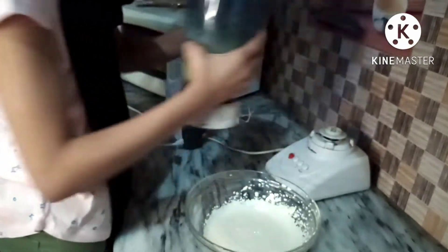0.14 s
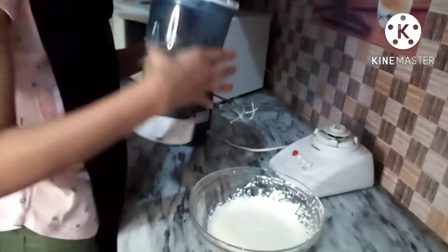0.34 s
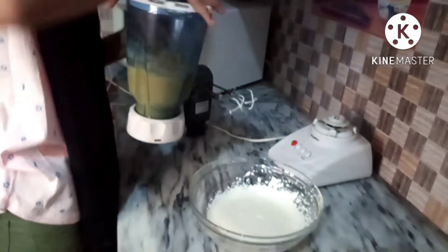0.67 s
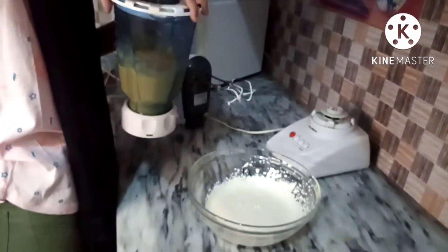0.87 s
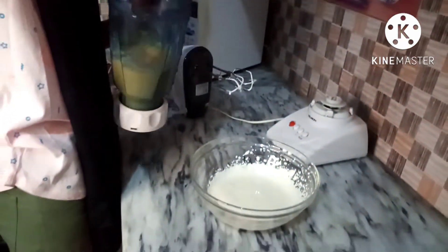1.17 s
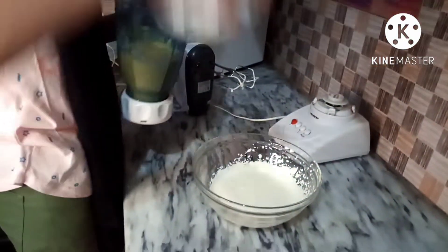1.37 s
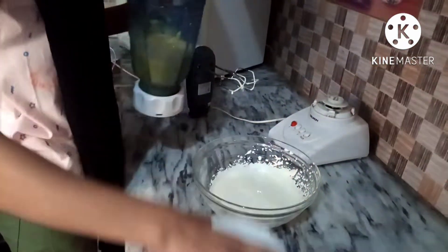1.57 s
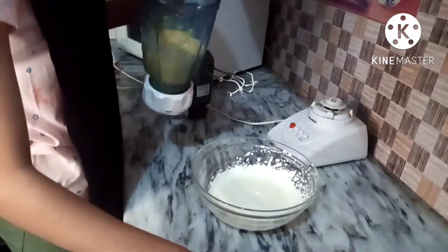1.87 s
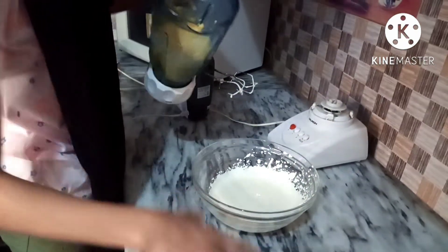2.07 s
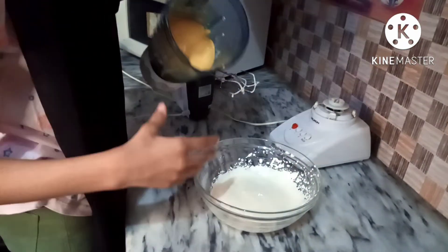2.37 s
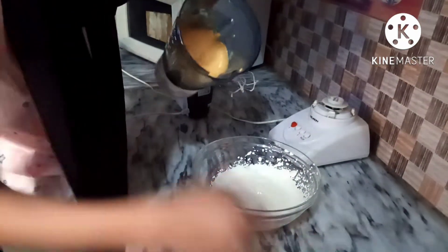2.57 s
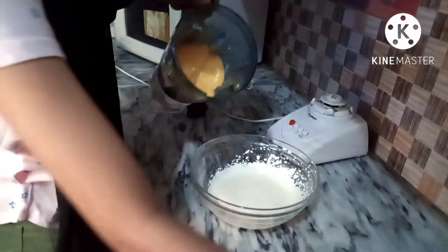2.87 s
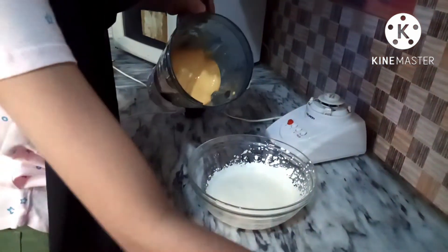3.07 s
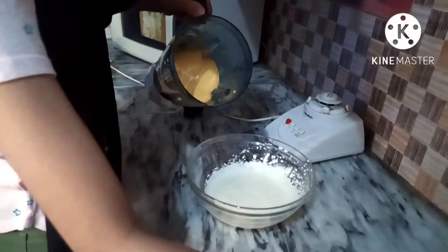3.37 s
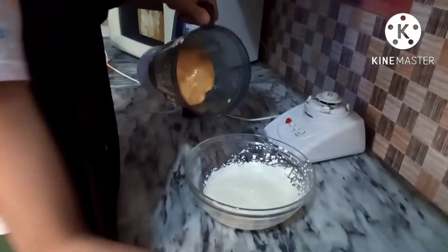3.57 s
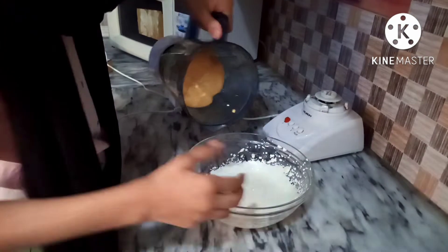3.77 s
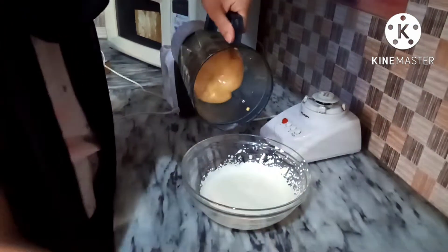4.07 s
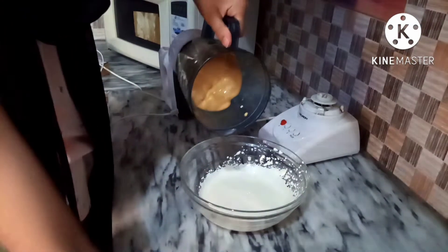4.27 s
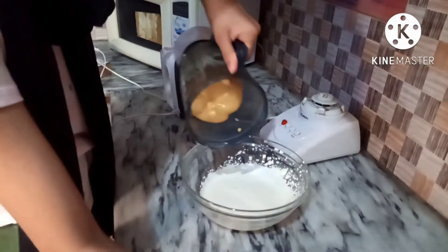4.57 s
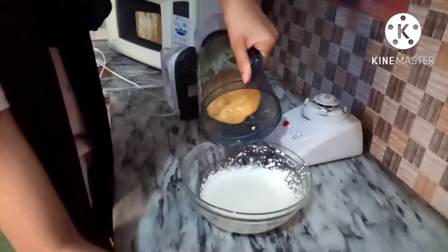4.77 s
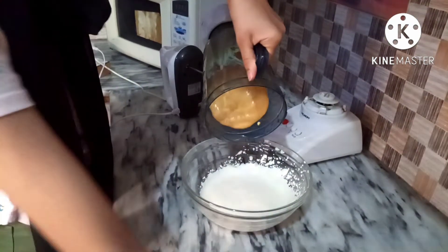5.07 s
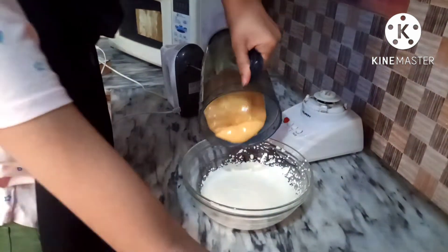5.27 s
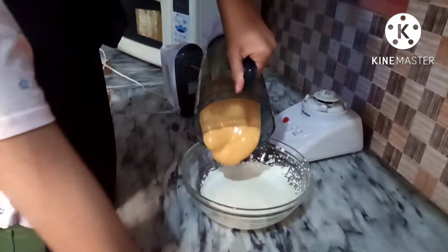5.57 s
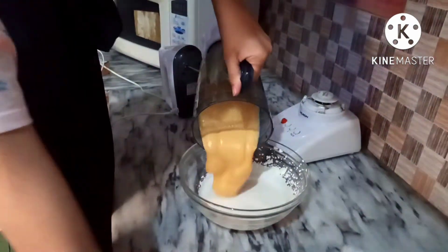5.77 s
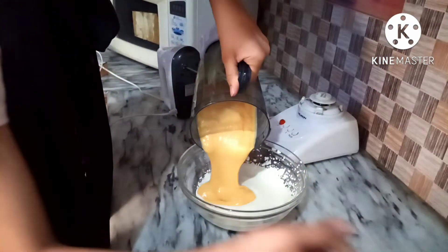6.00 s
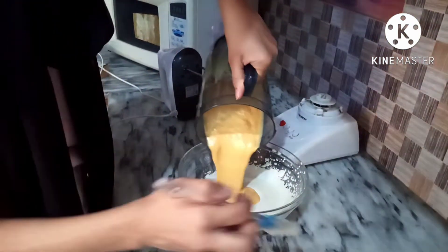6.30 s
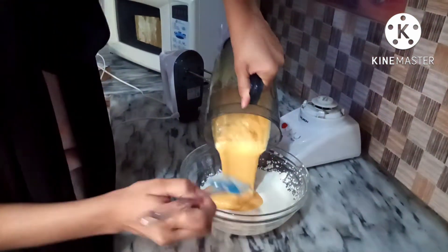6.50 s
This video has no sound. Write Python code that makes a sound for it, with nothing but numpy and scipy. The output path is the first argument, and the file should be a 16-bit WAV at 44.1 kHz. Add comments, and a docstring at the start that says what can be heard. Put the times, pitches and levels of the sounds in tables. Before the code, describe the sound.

A refrigerator hums and whines faintly in a small, slightly echoing kitchen. Close by, a plastic lid works loose from a blender jar in a few quiet snaps and thuds, and is put down on stone with one loud, dry clack. After a pause, a metal spoon clatters on the counter in two short ringing bursts, with light clinks against a filled glass bowl. Soft bumps and clothing rustles fall in between.

```python
"""Blender lid and spoon in a tiled kitchen

A plastic lid sticks and slips off a blender jar, thumping the air inside, then clacks on a stone counter.
A steel spoon ticks and bounces on the stone and clinks on a glass bowl. Each contact is a crack plus
decaying modes, echoed by the small room. Hands bump, sleeves rustle, a refrigerator hums and whines."""
import sys
import numpy as np
from scipy import signal
from scipy.fft import rfft, irfft, next_fast_len
from scipy.io import wavfile

SR = 44100
rng = np.random.default_rng(int(sys.argv[2]) if len(sys.argv) > 2 else 0)


def inscribe(sig):
    """Save sig as 16-bit PCM at rate SR to the path in sys.argv[1].

    A 1-D sig is mono; a 2-D sig holds one channel per row.
    Samples are clipped to [-1, 1] before scaling.
    """
    pcm = np.round(np.clip(np.atleast_2d(sig).T, -1, 1) * 32767)
    wavfile.write(sys.argv[1], SR, pcm.astype(np.int16))


N = 292812
TIME_S = np.arange(N) / SR
RING_S = np.arange(SR // 3) / SR
NOISE_HZ = np.fft.rfftfreq(next_fast_len(N, True), 1 / SR) + 1

ECHO_DECAY = [(150, .5), (600, .54), (1200, .49), (2500, .46), (5000, .41), (7500, .26), (11000, .18),
              (15000, .15)]  # echo decay as heard, treble cut short: f/Hz, t60/s
NOISE_FLOOR = [(25, -23), (45, -13), (70, -9), (130, -7), (190, -13.5), (450, -7.5), (700, -14.5),
               (1600, -17.5), (2400, -20.5), (3100, -17), (3750, -23), (4400, -18), (5500, -26),
               (7300, -29.5), (8000, -37.5), (14000, -34.5), (15300, -28)]  # room air plus a microphone hiss peak near 15 kHz: f/Hz, gain/dB
FRIDGE_DRONE = [(107.2, -81.5, 20), (151, -82, 18), (218.5, -81.5, 36), (299, -76.5, 32), (341, -76, 16)]  # low tones: f/Hz, level/dB, width/Hz
FRIDGE_WHINE = [(2610, -92, 17), (2862, -88.5, 45), (3140, -93, 16), (3228, -80.5, 30), (3274, -83, 23),
                (4100, -89.5, 21), (4240, -87.5, 20), (5540, -93, 40), (6067, -100, 17), (6630, -98.5, 10)]  # high tones: f/Hz, level/dB, width/Hz
PANEL_TONES = [(543, -2), (1928, -14.5)]  # loose refrigerator panel: f/Hz, gain/dB
PANEL_ENVELOPE = [(0, -93.5), (2.2, -88.5), (2.7, -78.5), (3.5, -81.5), (4.7, -75.5), (6.6, -75)]  # its swell: t/s, level/dB
HAND_BUMPS = [(0.384, -58), (.497, -60), (0.949, -58.5), (2.484, -58.5), (2.981, -61.5), (3.856, -57.5),
              (4.391, -56.5), (5.646, -61), (6.21, -62.5), (6.37, -60.5)]  # soft bumps: t/s, level/dB
SLEEVE_RUSTLES = [(0.267, -65.5, 3060), (2.199, -73, 4260), (2.536, -73, 1570), (4.764, -74, 3200),
                  (4.964, -70.5, 3070)]  # arm movements: t/s, level/dB, centre/Hz

BOWL_HITS = [(3.883, -50.5, -10), (5.306, -51, -5), (5.3095, -42.5, -0.5), (5.522, -58.5, -8.5),
             (5.5426, -41, 1.5), (5.563, -40, 3)]  # spoon on glass: t/s, level/dB, tilt/(dB/oct)
BOWL_MODES = [(1100, 0, .14), (1890, 2.5, 0.051), (3410, 4.5, .08), (3520, 9.5, 0.03), (4050, -4.5, 0.075),
              (5890, -21.5, 0.04)]  # filled glass bowl: f/Hz, level/dB, t60/s
BOWL_CRACK = [(200, -32), (650, -22), (850, -4.5), (1080, 6), (1400, -4), (1900, 1), (2500, -2), (3500, 8),
              (4200, 2.5), (5000, -4.5), (6200, 2.5), (7200, -27.5), (10000, -28), (15000, -30)]  # contact spectrum: f/Hz, gain/dB

SPOON_NUDGES = [(3.341, -45.5, 1.5, 0.28), (3.3908, -44.5, 3, 0), (3.758, -29, 3, 0.81),
                (3.7925, -31, 1, 1), (3.8782, -35, 7.5, .95), (3.906, -53, 8, 0.87)]  # held spoon on stone: t/s, level/dB, tilt/(dB/oct), hardness/(0-1)
HELD_SPOON_MODES = [(1078, -13, .05), (1650, -11.5, 0.022), (2300, -3.5, 0.029), (2439, -0.5, .04),
                    (3184, -2.5, 0.054), (3600, -3.5, .025), (4530, -12, 0.026), (5430, -4, 0.042),
                    (7996, -13, 0.06), (11200, -30.5, .05)]  # finger-damped steel: f/Hz, level/dB, t60/s
NUDGE_CRACK = [(60, -42), (200, -20.5), (600, -18.5), (1300, 2), (2200, 1), (3200, 0), (4000, -1.5),
               (5300, 1.5), (7000, -9), (8200, -6.5), (10500, -15), (14000, -9.5), (15200, -0.5)]  # contact spectrum: f/Hz, gain/dB
SPOON_BOUNCES = [(3.977, -38, -9.5), (3.981, -26, -2), (3.994, -30, -7), (4.0025, -22, -5),
                 (4.008, -22, -3.5), (4.014, -19.5, 2), (4.0188, -16.5, 0.5), (4.0468, -22.5, 2.5),
                 (4.066, -26.5, 1.5), (4.0835, -29.5, 0), (4.097, -29.5, 0.5), (4.109, -39, -4.5),
                 (4.115, -38, 2.5), (5.402, -46.5, -8.5), (5.411, -29.5, -2.5), (5.4152, -26, 1),
                 (5.4245, -27.5, 2), (5.432, -25.5, -1), (5.438, -30, -0.5)]  # loose spoon on stone: t/s, level/dB, tilt/(dB/oct)
FREE_SPOON_MODES = [(3403, -7, 0.12), (3430, -17, .35), (3414, 1, 0.12), (3456, -2, .08),
                    (4100, -12.5, .12), (5576, 2, 0.1), (5590, -19.5, .3), (5560, -12, 0.067),
                    (6230, -16, 0.044), (8096, -26.5, 0.11), (9100, -23.5, .08), (11090, -26.5, 0.1703),
                    (12720, -25, 0.086), (14302, -15.5, .13)]  # free steel: f/Hz, level/dB, t60/s
BOUNCE_CRACK = [(60, -41.5), (200, -21), (550, -20), (800, -7.5), (1100, -1.5), (1700, 3), (2100, -2.5),
                (2500, 0.5), (3400, 6), (5000, -2.5), (6200, 8), (7200, -36.5), (9200, -18.5), (10500, -36),
                (13000, -20.5), (15200, -22.5)]  # contact spectrum: f/Hz, gain/dB

RIM_SLIPS = [(0.675, -59.5, -49.5), (.691, -58, -48), (0.98, -58, -49.5), (1.0539, -47.5, -44),
             (1.071, -51.5, -40), (1.093, -55, -38), (1.1222, -48, -43), (1.156, -52.5, -66)]  # lid slipping on the jar: t/s, snap/dB, thud/dB
RIM_MODES = [(1203, 4.5, 0.023), (1772, 0, 0.054), (2320, -3, 0.03)]  # jar rim: f/Hz, level/dB, t60/s
RIM_CRACK = [(200, -11), (500, 10.5), (1800, 3), (3000, 5.5), (6200, -3), (7600, -28), (15000, -47)]  # snap spectrum: f/Hz, gain/dB
JAR_MODES = [(201, -22.5, 0.11), (326, -10, 0.3), (532, -11, 0.074), (651, -15, 0.07)]  # hollow jar: f/Hz, level/dB, t60/s
GAP_PITCH = [(.68, 330), (1.055, 334), (1.095, 450.5), (1.125, 399.4)]  # air resonance under the lifting lid: t/s, f/Hz
LID_LANDINGS = [(1.8653, -15, 2)]  # plastic on stone: t/s, level/dB, tilt/(dB/oct)
LID_MODES = [(604, -20.5, 0.036), (1157, -14, 0.14), (1276, -2.5, 0.067), (2170, 3.5, 0.039),
             (2228, -7.5, .08), (4078, -12.5, 0.045)]  # plastic lid: f/Hz, level/dB, t60/s
LID_CRACK = [(80, -36), (190, -16.5), (300, -30), (560, -7.5), (700, -10), (830, 0.5), (1200, 8),
             (1650, -3), (2200, 4.5), (3000, -5), (4100, -2), (5000, -9), (5600, -16.5), (6400, -13),
             (8000, -36), (13500, -44.5), (15000, -34)]  # contact spectrum: f/Hz, gain/dB


def amp(db):
    return 10 ** (np.asarray(db) / 20)


def lookup(points, hz):
    """Interpolate over log frequency."""
    f, value = np.transpose(points)
    return np.interp(np.log(hz + 1), np.log(f + 1), value)


def unit(x, size=None):
    """Scale so the first size samples have rms 1."""
    return x / np.sqrt(np.mean(x[:size] ** 2) + 1e-20)


def add(mix, start_s, sound):
    part = mix[round(start_s * SR):][:len(sound)]
    part += sound[:len(part)]


def colour(x, spectrum, size=2048):
    """Minimum-phase filter; keeps attacks sharp."""
    log_gain = np.log(amp(lookup(spectrum, abs(np.fft.fftfreq(size, 1 / SR)))))
    taps = np.fft.ifft(np.exp(np.conj(signal.hilbert(log_gain)))).real
    return signal.fftconvolve(x, taps)[:len(x)]


def noise(gain):
    """Steady noise, rms 1, shaped by gain over NOISE_HZ."""
    return unit(irfft(gain * rng.standard_normal(2 * len(gain)).view(complex))[:N])


def drift(rate_hz):
    """Slow random wander, rms 1."""
    return noise(np.exp(-(NOISE_HZ / rate_hz) ** 2))


def tones(lines):
    """Narrow noise bands: tones wavering in level and phase."""
    power = sum(amp(2 * db) / width_hz / (1 + (2 * (NOISE_HZ - hz) / width_hz) ** 2) ** 2
                for hz, db, width_hz in lines)
    rms = np.linalg.norm([amp(db) for _, db, _ in lines])
    return rms * noise(np.sqrt(power))


def fade(t60_s):
    return np.exp(-np.log(1000) * RING_S / t60_s)


def ring(modes, uneven_db=1, detune=0.002):
    """Decaying modes; each contact loads and excites them a little differently."""
    out = 0
    for hz, db, t60_s in modes:
        share, load = rng.standard_normal(2)
        loaded_hz = hz * (1 + detune * load)
        out += amp(db + uneven_db * share) * fade(t60_s) * np.sin(2 * np.pi * loaded_hz * RING_S)
    # a small body radiates little below its lowest mode
    radiation = signal.butter(2, modes[0][0] / 2, "high", fs=SR, output="sos")
    return unit(signal.sosfilt(radiation, out), size=128)


def crack(spectrum, spread_s, count=100, size=4096):
    """Contact click, dispersed by many heavily damped resonances."""
    hz = (np.arange(count) + 2 * rng.random(count)) / spread_s
    pole_rad = 2 * np.pi * hz[hz < SR / 2] / SR
    radius = np.exp(-1.4 / (spread_s * SR))
    all_pass = [(radius ** 2, c, 1, 1, c, radius ** 2) for c in -2 * radius * np.cos(pole_rad)]
    click = colour(signal.sosfilt(all_pass, signal.unit_impulse(size)), spectrum)
    return np.pad(unit(click, size=128), (0, len(RING_S) - size))


def blow(sound, db, tilt_db_oct):
    """Tilt the strike brighter or duller; set the level of its first 3 ms."""
    tilt = [(2 ** octave, tilt_db_oct * (octave - 10)) for octave in (9, 13)]
    return amp(db) * unit(colour(sound, tilt), size=128)


def brush(length_s, centre_hz, width_oct):
    """Soft grainy puff; swells quickly, then ebbs."""
    hz = np.fft.rfftfreq(len(RING_S), 1 / SR) + 1
    fibres = rng.standard_normal(len(RING_S)) * rng.exponential(1, len(RING_S))
    band = np.exp(-0.5 * (np.log2(hz / centre_hz) / width_oct) ** 2)
    rub = unit(irfft(rfft(fibres) * band, len(RING_S)))
    age = 3 * RING_S / length_s  # envelope peaks at age 1
    return rub * age * np.exp((1 - age ** 2) / 2)


def kitchen(x, early_db=3, early_s=0.022, count=5000):
    """Dense echoes off tiles and counter; decay set per band, treble cut short."""
    taps = np.zeros(SR)
    taps[rng.integers(SR // 300, SR, count)] = rng.choice([-1., 1.], count)
    hz, t, bands = signal.stft(taps, SR, nperseg=256)
    decay = np.exp(-np.log(1000) * t / lookup(ECHO_DECAY, hz)[:, None])
    early_boost = amp(early_db * np.exp(-t / early_s))
    tail = signal.istft(bands * decay * early_boost, SR, nperseg=256)[1]
    return signal.fftconvolve(x, tail / np.linalg.norm(tail))[:N]


def background_noise(floor_db=-76, waver_db=0.8, rumble_db=-76.5, lumps_db=3.5):
    """Quiet room air, microphone hiss and a lumpy low rumble."""
    floor = amp(floor_db + waver_db * drift(2.3)) * noise(amp(lookup(NOISE_FLOOR, NOISE_HZ)))
    low_band = np.exp(-(np.log2(NOISE_HZ / 95) / 0.8) ** 2)
    rumble = amp(rumble_db + lumps_db * drift(10)) * noise(low_band)
    return floor + rumble


def fridge(drone_waver_db=1.6, whine_waver_db=0.77):
    """Low drone and faint whine, both wavering."""
    drone = tones(FRIDGE_DRONE) * amp(drone_waver_db * drift(5))
    whine = tones(FRIDGE_WHINE) * amp(whine_waver_db * drift(7))
    return drone + whine


def fridge_panel(wobble_rad=2, waver_db=2):
    """A loose panel starts to sing, wavering in phase and level."""
    lines = sum(amp(db) * np.sqrt(2) * np.sin(2 * np.pi * hz * TIME_S + wobble_rad * drift(6))
                for hz, db in PANEL_TONES)
    level_db = np.interp(TIME_S, *np.transpose(PANEL_ENVELOPE)) + waver_db * drift(10)
    return amp(level_db) * lines


def handling():
    """Hands bump dully; sleeves rustle."""
    out = np.zeros(N)
    for t, db in HAND_BUMPS:
        add(out, t, amp(db) * brush(length_s=0.05, centre_hz=112, width_oct=0.48))
    for t, db, centre_hz in SLEEVE_RUSTLES:
        add(out, t, amp(db) * brush(length_s=0.1, centre_hz=centre_hz, width_oct=0.53))
    return out


def bowl_clinks(crack_db=-1):
    """Steel taps glass damped by its contents; close modes beat."""
    out = np.zeros(N)
    for t, db, tilt_db_oct in BOWL_HITS:
        glass = ring(BOWL_MODES, detune=0.001)
        contact = amp(crack_db) * crack(BOWL_CRACK, spread_s=0.0025)
        add(out, t, blow(glass + contact, db, tilt_db_oct))
    return out


def spoon_ticks(soft_crack_db=-3, hard_crack_db=11, soft_top_hz=4900, hard_top_hz=19060):
    """The finger-damped spoon rings briefly on stone; harder contact gives a sharper crack."""
    out = np.zeros(N)
    for t, db, tilt_db_oct, hardness in SPOON_NUDGES:
        crack_db = soft_crack_db + hardness * (hard_crack_db - soft_crack_db)
        top_hz = soft_top_hz * (hard_top_hz / soft_top_hz) ** hardness
        steel = ring(HELD_SPOON_MODES, uneven_db=6)
        contact = amp(crack_db) * crack(NUDGE_CRACK, spread_s=0.0012)
        low_pass = signal.butter(6, top_hz, fs=SR, output="sos")
        add(out, t, blow(signal.sosfilt(low_pass, steel + contact), db, tilt_db_oct))
    return out


def spoon_rattle(crack_db=-3.5, chatter_per_s=450, chatter_db=-11, chatter_t60_s=0.063):
    """Each bounce rings the loose spoon and trails a chatter of tiny contacts."""
    out = np.zeros(N)
    for t, db, tilt_db_oct in SPOON_BOUNCES:
        steel = ring(FREE_SPOON_MODES, detune=0.0007)
        contact = amp(crack_db) * crack(BOUNCE_CRACK, spread_s=0.003)
        strike = blow(steel + contact, db, tilt_db_oct)
        touches = rng.random(len(RING_S)) < chatter_per_s / SR
        impulses = touches * rng.choice([-1, 1], len(RING_S)) * fade(chatter_t60_s)
        chatter = signal.fftconvolve(impulses, strike)[:len(strike)]
        add(out, t, strike + amp(chatter_db) * chatter)
    return out


def lid_off(rim_db=-6, swell_s=0.003, rub_at_s=1.035, rub_db=-55.5):
    """Stick-slip and a rub; each slip snaps the rim and thumps the air, higher once the gap opens."""
    out = np.zeros(N)
    swell = 1.3 * (1 - np.exp(-RING_S / swell_s))
    for t, snap_db, thud_db in RIM_SLIPS:
        air_hz = np.interp(t, *np.transpose(GAP_PITCH))
        air_mode = (air_hz, 0, 0.08)  # f/Hz, level/dB, t60/s
        thud = ring(JAR_MODES + [air_mode], uneven_db=3, detune=0.003) * swell
        snap = crack(RIM_CRACK, spread_s=0.00093) + amp(rim_db) * ring(RIM_MODES)
        add(out, t, amp(snap_db) * snap + amp(thud_db) * thud)
    add(out, rub_at_s, amp(rub_db) * brush(length_s=0.1, centre_hz=834, width_oct=1.09))
    return out


def lid_down(crack_db=3, skim_lead_s=0.024, skim_db=-48):
    """Plastic skims the stone and lands hard: a dry clack with a few short modes."""
    out = np.zeros(N)
    for t, db, tilt_db_oct in LID_LANDINGS:
        plastic = ring(LID_MODES, uneven_db=0.3, detune=0.001)
        contact = amp(crack_db) * crack(LID_CRACK, spread_s=0.001493)
        add(out, t, blow(plastic + contact, db, tilt_db_oct))
        skim = brush(length_s=0.019, centre_hz=4100, width_oct=0.32)
        add(out, t - skim_lead_s, amp(db + skim_db) * skim)
    return out


def scene():
    """Mono mix: contacts with their echoes over the background."""
    # sound, echo/dB
    sources = [(lid_off(), -5), (lid_down(), -3),
               (spoon_ticks(), -6), (spoon_rattle(), -9), (bowl_clinks(), -7)]
    contacts = sum(sound + amp(echo_db) * kitchen(sound) for sound, echo_db in sources)
    return (contacts + handling() + background_noise() + fridge() + fridge_panel())[None]


def record(dry):
    """Band limit."""
    low_pass = signal.firwin(301, cutoff=15700, window=("kaiser", 9), fs=SR)
    return signal.oaconvolve(dry, low_pass[None], "same")


dry = scene()
out = record(dry)
inscribe(out)
```